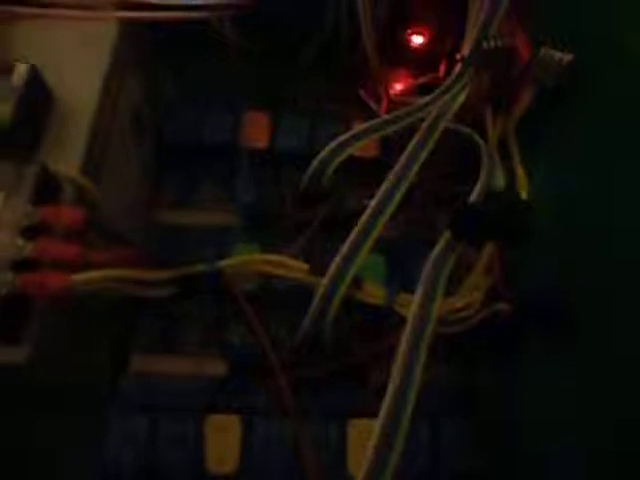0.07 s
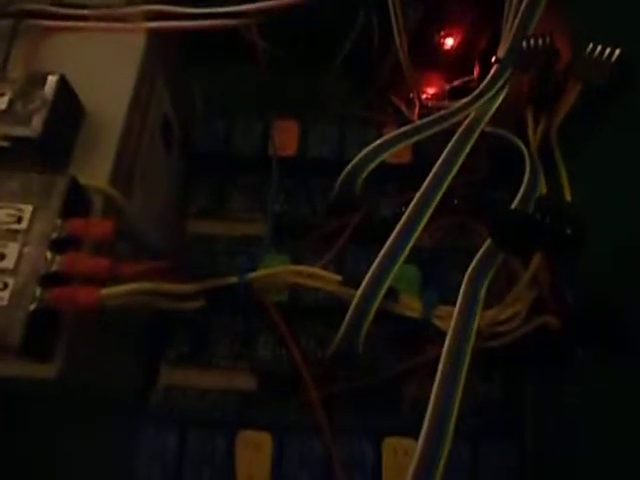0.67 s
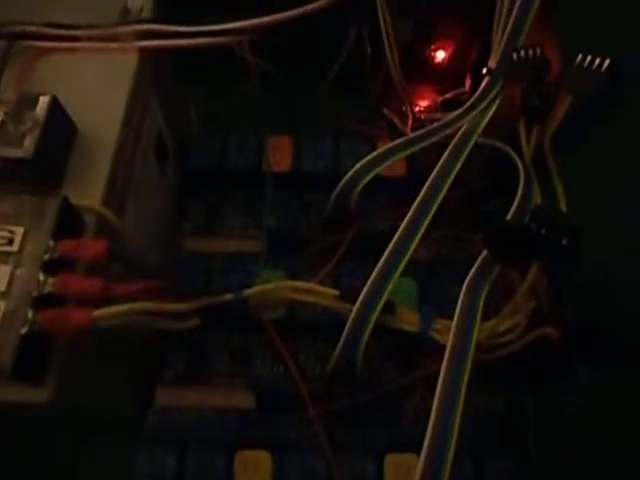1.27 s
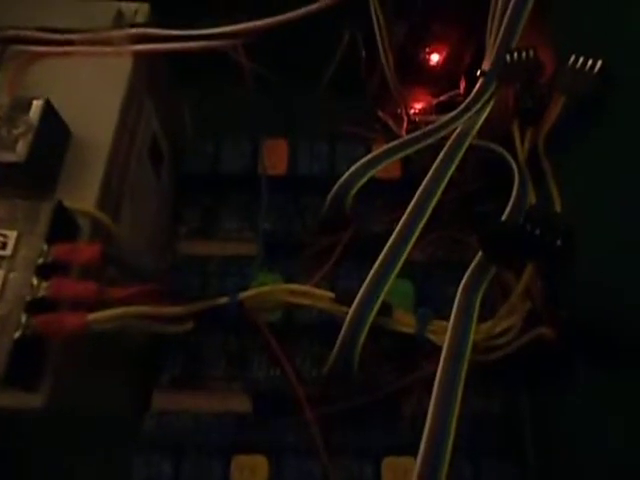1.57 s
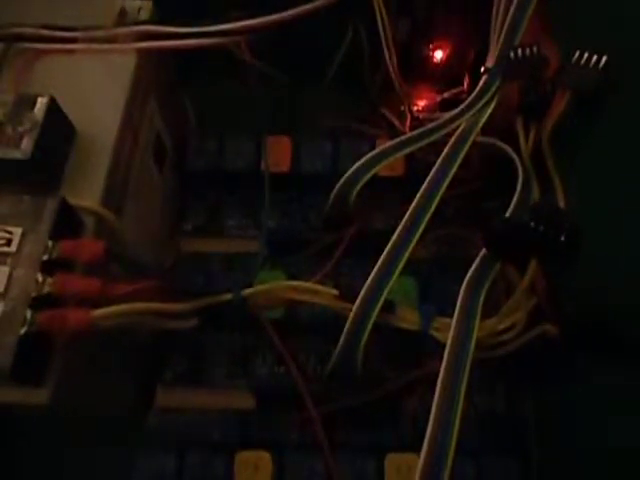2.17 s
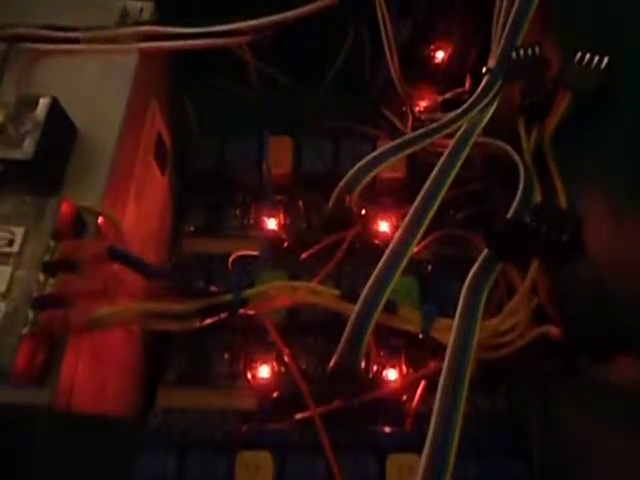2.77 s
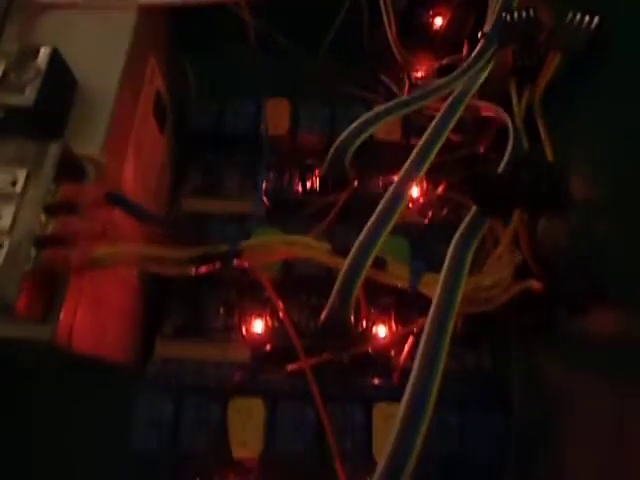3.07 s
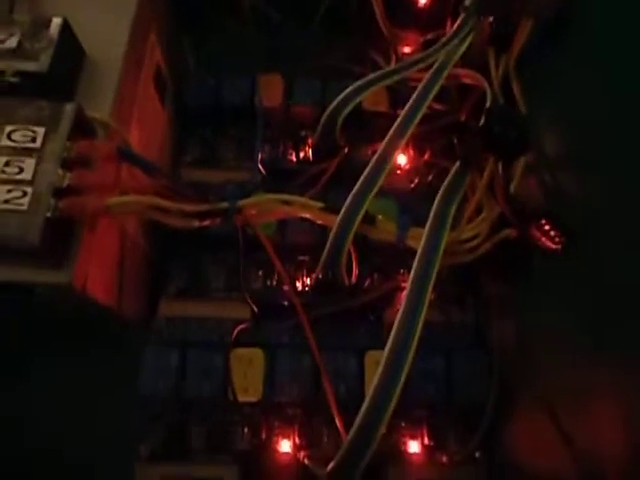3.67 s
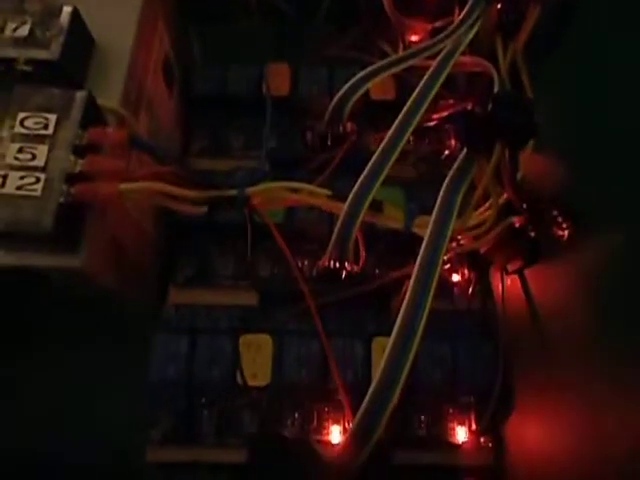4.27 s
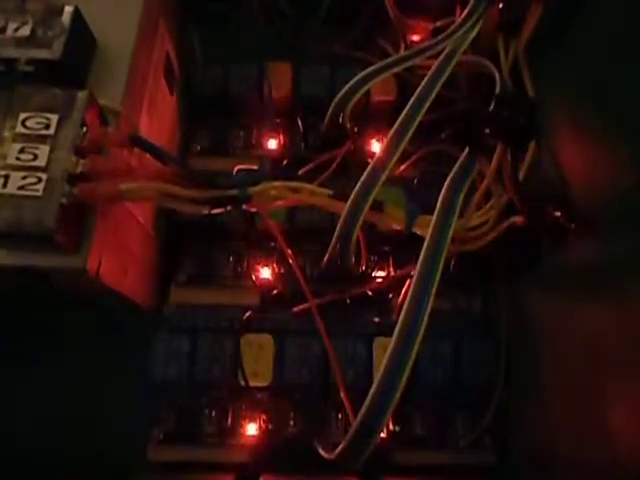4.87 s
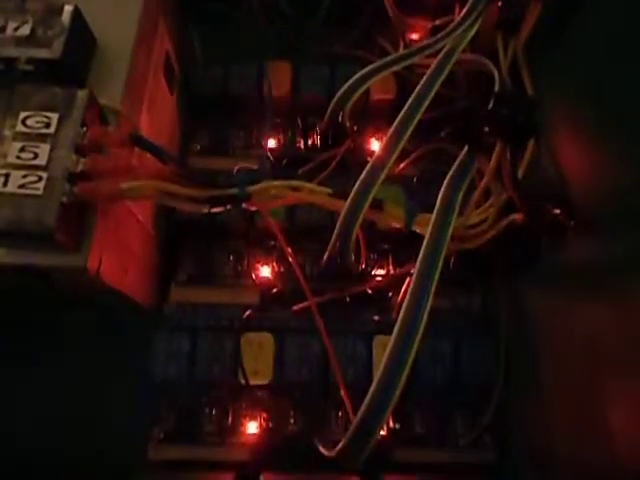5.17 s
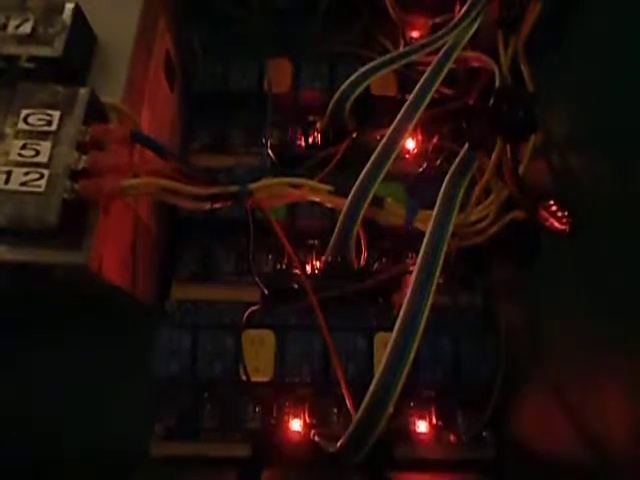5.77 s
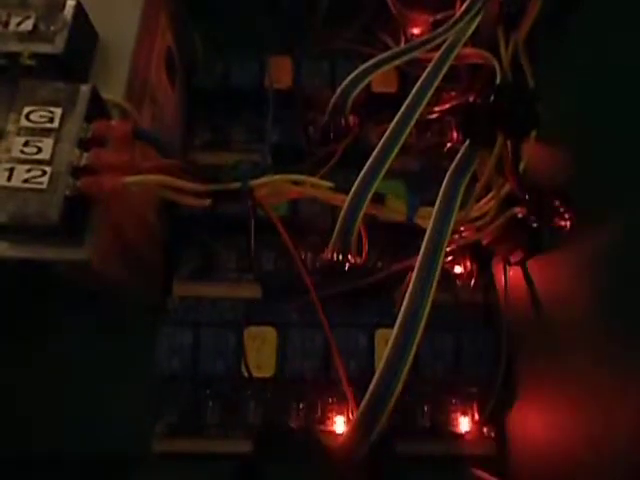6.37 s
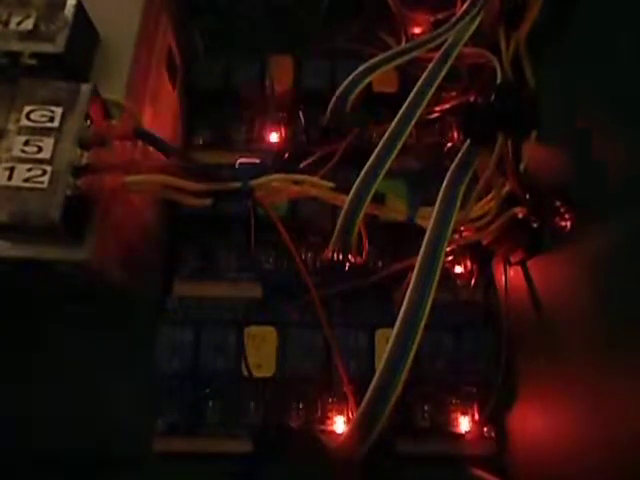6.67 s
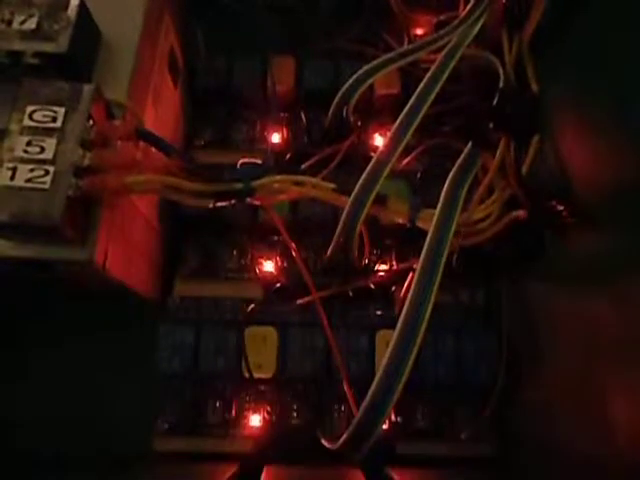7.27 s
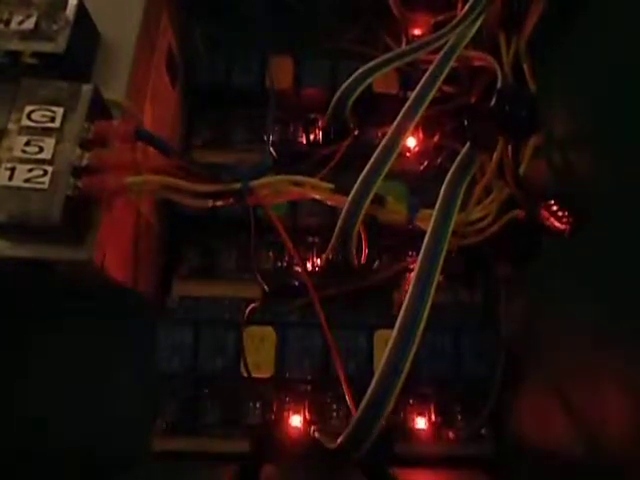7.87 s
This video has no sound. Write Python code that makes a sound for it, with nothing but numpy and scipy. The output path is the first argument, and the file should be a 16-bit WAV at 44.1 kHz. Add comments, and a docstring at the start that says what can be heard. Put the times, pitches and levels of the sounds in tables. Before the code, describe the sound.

A bank of small relays clicks in quick, evenly repeating bursts, close up, over faint hiss and hum in a quiet room.

```python
"""A bank of small relays clicks through an 18-step light sequence, close up, six steps to a burst.
An armature drops out and, milliseconds later, the next snaps shut and bounces; cases, circuit boards
and springs ring. A quiet room answers. Hiss and hum sink as the clicking starts; around it sit
a few faint ticks, one thin whistle and the low drone of an engine revving far away."""
import sys
import numpy as np
from scipy import signal
from scipy.fft import rfft, irfft
from scipy.io import wavfile

SR = 44100
rng = np.random.default_rng(int(sys.argv[2]) if len(sys.argv) > 2 else 0)


def transcribe(signal):
    """Save signal, clipped to [-1, 1], as a 16-bit WAV file at the path in sys.argv[1]."""
    frames = np.atleast_2d(signal).T
    limited = np.clip(frames, -1, 1)
    pcm = np.round(limited * 32767).astype(np.int16)
    wavfile.write(sys.argv[1], SR, pcm)


N = 348831
SIZE = 8192  # samples in one click
HZ = np.fft.rfftfreq(SIZE, 1 / SR)


def amp(db):
    """Decibels to gain."""
    return 10 ** (np.asarray(db) / 20)


def unit_rms(x):
    """Scales to rms 1."""
    return x / np.sqrt(np.mean(x ** 2) + 1e-20)


def read(points, hz):
    """Reads a table on a log-frequency axis."""
    f, value = np.transpose(points)
    return np.interp(np.log(hz + 1), np.log(f + 1), value)


def add(mix, s, sound):
    """Mixes a sound in at time s."""
    part = mix[round(s * SR):][:len(sound)]
    part += sound[:len(part)]


def ramp(start, length):
    """Linear fade from 0 to 1, timed in seconds."""
    return np.clip((np.arange(N) / SR - start) / length, 0, 1)


def drift(hz):
    """Smooth random modulation of rms 1, up to about the given rate."""
    smoothing = np.exp(-(np.fft.rfftfreq(N, 1 / SR) / hz) ** 2)
    return unit_rms(irfft(rfft(rng.standard_normal(N)) * smoothing, N))


def tone(hz):
    """A sine of rms 1 that follows a pitch curve."""
    return np.sqrt(2) * np.sin(2 * np.pi * np.cumsum(hz) / SR)


def causal(gain):
    """Minimum-phase response: it has this gain and rings only after the blow."""
    log_gain = np.log(np.r_[gain, gain[-2:0:-1]] + 1e-5)
    return np.exp(np.conj(signal.hilbert(log_gain)))[:len(gain)]


def body(modes):
    """Gain of a set of resonances."""
    f = HZ + 1
    power = sum(amp(db) ** 2 / (1 + ((f * f - hz * hz) / (f * width)) ** 2) for hz, width, db in modes)
    return np.sqrt(1e-4 + power)


# Hum and thin whine: (pitch [Hz], level against the hiss [dB], pitch waver [Hz])
HUM_TONES = [(60, -15, 2), (266.6, -15.5, 2.2), (332.5, -15.5, 2.48), (493, -8.5, 1.02), (592, -19.5, 7),
             (7300, -34, 38), (7830, -34, 12), (8225, -38.5, 12)]
def hum(waver_db=1.5):
    """Held tones, each wavering in level and pitch."""
    return sum(amp(db + waver_db * drift(3.9)) * tone(hz + waver * drift(10))
               for hz, db, waver in HUM_TONES)


# Colour of the noise bed: (frequency [Hz], relative density [dB])
HISS_COLOUR = [(8, -9.5), (20, -2.5), (59, -1), (85, -8.5), (133, -7), (200, -6), (264, -12), (333, -10.5),
               (398, -14), (488, -8), (600, -10), (760, -16.5), (1390, -19.5), (3000, -25), (5000, -29.5),
               (7300, -31.5), (8100, -41.5), (9000, -62.5), (11700, -91.5)]
def background(bed_db=-48, hiss_db=-1, hiss_sink_db=-10.5, hum_sink_db=-9.5,
               rumble_hz=52, rumble_db=-54):
    """Hiss and hum duck at the first relay click and stay down; the deepest rumble holds."""
    f = np.fft.rfftfreq(N, 1 / SR)
    noise = unit_rms(irfft(rfft(rng.standard_normal(N)) * amp(read(HISS_COLOUR, f)), N))
    rumble = irfft(rfft(noise) / (1 + (f / rumble_hz) ** 10), N)
    sunk = ramp(BURSTS[0][0], length=.055)
    hiss = amp(hiss_db + hiss_sink_db * sunk) * (noise - rumble)
    bed = hiss + amp(hum_sink_db * sunk) * hum()
    return ramp(start=.068, length=.0026) * (amp(bed_db) * bed + amp(rumble_db) * rumble)


def chatter(grain, rise, fall, linger_db, linger, even_hz=330, impact=0):
    """Spectrum of a blow: optional hard impact, dense bounces, then scatter from nearby parts."""
    t = np.arange(SIZE) / SR
    decay = np.exp(-t / fall) + amp(linger_db) * np.exp(-t / linger)
    bounces = grain * (1 - np.exp(-t / rise)) * decay
    blow = rfft(bounces / np.linalg.norm(bounces)) + impact * np.exp(-2j * np.pi * HZ * rise)
    # flatten the broad colour, so the struck body sets the tone
    window = np.exp(-.5 * (np.r_[-HZ[200:0:-1], HZ[:201]] / even_hz) ** 2)
    power = np.convolve(abs(blow) ** 2, window / window.sum(), "same")
    return blow / causal(np.sqrt(power))


# Cues of the faint ticks: (time [s], relative level [dB])
TICK_CUES = [(0.1827, -23), (0.217, -32), (0.8295, -40), (0.8845, -36), (0.986, -35), (1.39, -37),
             (1.4188, -42), (1.6498, -33), (2.0563, -34), (2.8827, -43), (4.4163, -49.5), (5.1493, -44.5),
             (5.688, -43.5)]
# The ring of a tick: (frequency [Hz], width [Hz], level [dB])
TICK_MODES = [(1245, 160, 5.5), (2730, 200, 2.5), (3070, 260, 5.5), (4130, 690, -3.5), (5300, 500, -2.5),
              (6230, 740, -2)]
def ticks(level_db=20, dull_hz=6300):
    """Small dry blows on one set of resonances, duller than the relays."""
    out = np.zeros(N)
    ring = causal(body(TICK_MODES) / np.sqrt(1 + (HZ / dull_hz) ** 10))
    for s, db in TICK_CUES:
        blow = chatter(rng.standard_normal(SIZE), rise=.00076, fall=.0025, linger_db=-13, linger=.0067)
        add(out, s, amp(db + level_db) * irfft(ring * blow))
    return out


# Decay of the room: (frequency [Hz], time to fall 60 dB [s])
ROOM_T60 = [(200, 0.8), (1000, 0.21), (2400, 0.29), (3000, 0.11), (3700, 0.27), (7000, 0.22), (9000, 0.26)]
# Colour of its tail: (frequency [Hz], relative level [dB])
ROOM_COLOUR = [(130, 6), (400, -7.5), (1000, -2.5), (2300, -2.5), (3000, 3.5), (3700, -6.5), (5500, -2.5),
               (7200, -0.5), (8500, -2.5)]
def room(x, wet_db=-16.5, predelay_s=.019, taps_per_s=6000, wall_s=.019, wall_db=-25, wall_fall_s=.008):
    """Sparse reflections that die band by band, with a cluster from a nearby wall."""
    t = np.arange(SR // 2) / SR
    taps = rng.standard_normal(len(t)) * (rng.random(len(t)) < taps_per_s / SR)
    hz, age, bands = signal.stft(unit_rms(taps) * (t > predelay_s), SR, nperseg=256)
    band_db = read(ROOM_COLOUR, hz)[:, None] - 60 * age / read(ROOM_T60, hz)[:, None]
    tail = signal.istft(bands * amp(band_db), SR, nperseg=256)[1][:len(t)]
    cluster = rng.standard_normal(len(t)) * (t > wall_s) * np.exp(-abs(t - wall_s) / wall_fall_s)
    echo = amp(wet_db) * tail / np.linalg.norm(tail) + amp(wall_db) * cluster / np.linalg.norm(cluster)
    return signal.fftconvolve(x, echo)[:N]


def whistle(start_s=.24, length_s=.225, fade_s=.02, hz=7250, waver_hz=35, level_db=-73, flicker_db=2):
    """A faint, unsteady high tone that fades in and out once."""
    held = ramp(start_s, fade_s) - ramp(start_s + length_s - fade_s, fade_s)
    return held * amp(level_db + flicker_db * drift(15)) * tone(hz + waver_hz * drift(60))


# Bursts of clicks: (start [s], level trim [dB], lag of the last step [s])
BURSTS = [(2.3143, 2, 0.0055), (3.0416, -0.9, 0), (3.7664, -3.5, 0.0029), (4.5083, -2.5, 0.00064),
          (5.2356, 0, 0.00013), (5.961, 0, 0.0012), (6.7029, 0, 0), (7.4299, 0.3, 0)]
# The light sequence, a row to a step:
# (snap time in the burst [s], snap [dB], drop-out lead [s], drop-out [dB], board knock [dB])
SEQUENCE = [(0, .9, .0007, -18, 1.5), (.0696, -0.1, .002, -8, 2.1), (.1339, -1.3, .0029, -3.5, 3),
            (.1974, -3, 0.00035, -0.5, 2.5), (.2659, -0.5, .0024, -4, 2.5), (.3354, -2, .0071, -1, 4),
            (0, -1.5, .0036, -10, 2.5), (.0639, -1, 0.0026, -5.5, 0.8), (.131, -0.7, .0026, -1.5, 2),
            (.2003, -4, .007, -1, 0), (.2613, .2, .0017, -7.5, 0.4), (.328, -1.5, .0021, -9, 1.9),
            (0, -0.5, .0036, -1.5, 1.5), (.0638, 1.5, .0024, -11, 4.5), (.133, 2, .0062, -1.9, 0),
            (.1957, -3, .0043, -.5, 3.5), (.2634, 1.3, .0055, -3.5, 2.5), (.3244, -0.6, .002, -3, 3)]
def steps(per_burst=6, opening_knock_db=-8.5):
    """Loops the sequence; yields (place, time, snap gain, lead, drop-out gain, knock gain)."""
    for burst, (start, db, lag) in enumerate(BURSTS):
        for step in range(per_burst):
            place = (burst * per_burst + step) % len(SEQUENCE)
            offset, snap_db, lead, drop_db, knock_db = SEQUENCE[place]
            s = start + offset + lag * (step / (per_burst - 1)) ** 2
            if burst == 0:  # no relay is on yet: none drops out, and the board is knocked less
                yield place, s, amp(db + snap_db), 0, 0, amp(db + knock_db + opening_knock_db)
            else:
                yield place, s, amp(db + snap_db), lead, amp(db + drop_db), amp(db + knock_db)


def broadened(modes, widen=.0033):
    """Higher resonances are broadened at equal energy, so each click sounds dry rather than pinging."""
    return [(hz, width + widen * hz, db - 10 * np.log10(1 + widen * hz / width))
            for hz, width, db in modes]


# Board modes, then case modes, a list to each place in the sequence, before broadening:
# (frequency [Hz], width [Hz], level [dB])
RELAY_MODES = [
    [(131, 32, -0.5), (383.5, 18, 7.5), (402, 27.6, 17), (930, 44, 1.5), (1900, 600, -8), (3280, 420, 3),
     (4100, 250, 3), (5240, 70, 3.5), (6400, 310, 7), (7520, 140, 13.5), (7470, 130, 14.5), (8570, 180, 10)],
    [(125, 18, 6.5), (394, 24, 12.5), (430, 20, 9.5), (676, 36, 4), (770, 27, 0), (1180, 87, 1),
     (2093, 160, -5.5), (3630, 210, 4), (5100, 1000, 0), (6900, 150, 4), (7290, 183, 5.5), (8590, 178, -6)],
    [(133.4, 42, 6), (385, 41, 8.5), (655, 23, -0.5), (937, 54, -3.5), (1150, 35, 0), (2970, 560, -2.5),
     (3260, 123, 2.5), (4230, 91, -3), (4540, 84, 1.5), (5370, 660, 0), (6200, 214, -1.5), (7240, 750, 6)],
    [(119, 64, -5.5), (358, 48, 1.5), (611, 39, 7), (950, 73, -6.5), (1200, 30, -6.5), (1870, 300, -6.5),
     (2900, 342, -19.5), (3640, 130, -2.5), (4490, 347, -2.5), (5100, 130, 5.5), (6920, 320, 5.5),
     (7240, 240, 8.5)],
    [(118, 41, -1.5), (378.3, 35, 9), (630, 30, 0.5), (940, 16, 5.5), (1150, 110, -2.5), (2950, 680, -2.5),
     (4700, 296, -2), (5400, 163, 0), (6220, 740, 6.5), (7110, 210, 14), (7200, 117, 6.5), (8400, 280, 3.5)],
    [(115.2, 71, -4), (359.4, 41, 6.5), (480, 30, -5), (637, 20, 1), (935, 92, -9), (1650, 190, -11.5),
     (2273, 490, -8), (2870, 420, -6), (4400, 170, 0), (5140, 240, 2.5), (6340, 398, 2), (7110, 680, 6)],
    [(139, 51, -1.5), (407, 72, -3), (704, 24, 0), (956, 27, -2), (2120, 280, -9.5), (2880, 370, -5.5),
     (4100, 170, -1.5), (5330, 78, 2), (5460, 72, 3.5), (6200, 150, 12.5), (6640, 180, 16),
     (7030, 460, 13.5)],
    [(128.3, 23, 8), (368, 25, 7.5), (435, 21, 10.5), (642, 25, 7), (935, 130, -7.5), (1184, 52, -4),
     (1910, 270, -10), (2813, 680, -9), (3840, 280, -5.5), (5450, 150, 4), (5710, 360, 5.5),
     (6800, 540, 6.5)],
    [(137, 21, 8.5), (400, 60, 8.5), (636, 220, -2.5), (1863, 260, -3), (2780, 414, -3), (3266, 95, 3),
     (4130, 220, -3.5), (5540, 640, -8), (6130, 87, 6.5), (6655, 110, 2.5), (7180, 135, 15.5),
     (8550, 290, 3.5)],
    [(134, 27, 3.5), (383.5, 30, 10), (545, 42, 4), (940, 46, -1), (1186, 96, -4.5), (1870, 410, -3.5),
     (2260, 110, -4.5), (3687, 270, -0.5), (5054, 430, -8), (5980, 77, 1), (6220, 73, 1), (6960, 630, 9)],
    [(119, 33, -3.5), (385.5, 29, 12), (850, 27, 1), (947, 33, 1), (1120, 31, 3.5), (2357, 280, -7),
     (3770, 117, -4.5), (4300, 400, 0), (5100, 150, 3), (6800, 230, 2), (7500, 230, 5.5), (8600, 166, 5)],
    [(122, 39, -1.5), (361.3, 57, 3.5), (612, 30, -1), (1070, 94, 2), (1840, 500, -6), (2320, 70, 1.5),
     (2900, 200, -3.5), (5000, 630, 4), (6130, 360, 7), (6540, 130, 1), (7130, 210, 15), (7500, 1048, 6)],
    [(141, 32, 7), (414, 22, 16.5), (423, 19, 11.5), (580, 30, 1.5), (738, 29, 4.5), (965, 34, 8.5),
     (1828, 390, -8.5), (2960, 410, -0.5), (3980, 512, -2.5), (5330, 200, -4), (6385, 430, 4.5),
     (7430, 616, 7)],
    [(116.3, 11, 7), (422, 28, 6.5), (637, 38, 3.5), (886, 31, 3.5), (1160, 190, -4.5), (1930, 120, -1),
     (3740, 220, 6.5), (4230, 150, 8), (5209, 850, 6.5), (6740, 170, 18.5), (6940, 153, 19),
     (7050, 130, 18)],
    [(121, 40.5, 4.5), (357, 31, 10), (450, 30, 8), (607, 19, 10.5), (950, 59, -2.5), (1254, 39, 4.5),
     (2840, 180, 0), (4503, 140, -4.5), (5300, 200, 3.5), (5930, 210, 0), (6761, 270, 8.5),
     (7148, 133, 4.5)],
    [(122, 61, -4.5), (339.6, 48, 6.5), (518, 37, -4.5), (587, 32, 5), (928, 34, 1.5), (1850, 250, -5.5),
     (2882, 92, -12), (3628, 230, -5), (4090, 116, -5.5), (5130, 120, 2.5), (6115, 440, 1.5),
     (7350, 480, 0)],
    [(119, 32, 1), (362, 30, 3), (645, 17, 7), (920, 51, 5), (1930, 88, 1.5), (2314, 150, 0), (3005, 41, 4),
     (4570, 620, 0.5), (5761, 115, 1.5), (6360, 99, 6.5), (6747, 467, -1.5), (7600, 900, 2.5)],
    [(110, 84, -3.5), (350, 29, 10), (626, 30, 0.5), (940, 41, 1.5), (1140, 46, -3), (1820, 490, -12.5),
     (2860, 442, -5.5), (4900, 420, 5.5), (5800, 160, 1.5), (6705, 177, 4.5), (7240, 93, 11),
     (8100, 960, -3)],
]
# The softer blow of a drop-out, against a snap: (frequency [Hz], level [dB])
DROP_COLOUR = [(150, -21.5), (600, -8.5), (1500, 1.5), (3000, 1.5), (5000, 3.5), (7000, -3), (8500, 2)]
def relays(variation=.29, crossover_hz=1800, bend_s=.003207, own_share=.68):
    """Each armature bounces its own way, nearly alike each time. Returns direct sound and room send."""
    habits = rng.standard_normal((len(RELAY_MODES), 3, SIZE))
    gains = [body(broadened(modes)) for modes in RELAY_MODES]
    bank = np.sqrt(np.mean(np.square(gains), 0))  # towards the room the whole bank radiates
    voices = [(causal(own), causal(own ** own_share * bank ** (1 - own_share))) for own in gains]
    lows = 1 / (1 + (HZ / crossover_hz) ** 4)
    # bending waves in the board: the lower, the later; bend_s is the delay at 400 Hz
    board = causal(np.sqrt(lows)) * np.exp(-4j * np.pi * bend_s * np.sqrt(400 * HZ))
    case = causal(np.sqrt(1 - lows))
    soft = causal(amp(read(DROP_COLOUR, HZ)))
    out = np.zeros((2, N))
    for place, s, snap_gain, lead, drop_gain, knock_gain in steps():
        grain = habits[place] + variation * rng.standard_normal((3, SIZE))
        snap = chatter(grain[0], rise=.0003926, fall=.001, linger_db=-14, linger=.0062, impact=.74)
        drop = chatter(grain[1], rise=.00052, fall=.0053, linger_db=-22, linger=.0099)
        knock = chatter(grain[2], rise=.00079, fall=.0061, linger_db=-30.5, linger=.016, even_hz=45.6)
        for path, voice in zip(out, voices[place]):
            add(path, s, snap_gain * irfft(voice * case * snap))
            add(path, s - lead, drop_gain * irfft(voice * soft * drop))
            add(path, s - lead * .8, knock_gain * irfft(voice * board * knock))
    return out


# Armature springs, alike in every relay: (frequency [Hz], width [Hz], relative level [dB])
SPRING_MODES = [(2890, 15, -6), (3010, 14, -6), (3130, 14, -8.5)]
def springs():
    """Every snap leaves the springs ringing faintly."""
    out, t = np.zeros(N), np.arange(SIZE) / SR
    for _, s, snap_gain, *_ in steps():
        for (hz, width, db), turn in zip(SPRING_MODES, rng.random(len(SPRING_MODES))):
            height = 2 * np.pi * width / SR * snap_gain * amp(db)
            add(out, s, height * np.exp(-np.pi * width * t) * np.sin(2 * np.pi * (hz * t + turn)))
    return out


# The far engine, one blip and then a long pull: (time [s], firing rate [Hz])
REVS = [(3.5, 30), (3.88, 40), (4.25, 70.4), (4.5, 76.4), (4.699, 66), (5.07, 36.4), (5.35, 36.3),
        (6.9, 62), (7.9, 80)]
# The room booms as an engine order passes a low resonance: (frequency [Hz], level [dB])
ROOM_BOOM = [(30, -88), (36, -68), (41, -56), (48, -53), (59, -46), (67, -55), (72, -65), (80, -67),
             (104, -61.5), (124, -57.5), (140, -66.5), (160, -74)]
def engine(unsteady=.012, second_db=1, throttle_db=3.5, blip_hz_per_s=70, coast_db=-10, uneven_db=1.5):
    """Only the two lowest orders come through the walls: louder on the throttle, smoother coasting."""
    times, rates = np.transpose(REVS)
    hz = np.interp(np.arange(N) / SR, times, rates)
    firing_hz = hz * (1 + unsteady * drift(8.5))
    push = np.gradient(hz) * SR / blip_hz_per_s
    throttle, coast = np.clip(push, 0, 1), np.clip(-push, 0, 1)
    first_gain = amp(read(ROOM_BOOM, hz) + throttle_db * throttle + uneven_db * drift(7.2))
    second_gain = amp(read(ROOM_BOOM, 2 * hz) + second_db + coast_db * coast + uneven_db * drift(6.6))
    fade_in = ramp(times[0], times[1] - times[0]) ** 4
    return fade_in * (first_gain * tone(firing_hz) + second_gain * tone(2 * firing_hz))


def scene(top_hz=7900, engine_db=-2):
    """Clicks, their top treble rolled off, in the room over the bed, whistle and engine."""
    clicks = relays() + springs() + ticks()
    direct, send = signal.sosfilt(signal.butter(14, top_hz, fs=SR, output="sos"), clicks)
    return (direct + room(send) + background() + whistle() + amp(engine_db) * engine())[None]


def record(dry, edge_hz=9200):
    """A steep low-pass on the whole mix."""
    lowpass = signal.firwin(255, edge_hz, window=("kaiser", 9), fs=SR)
    return signal.oaconvolve(dry, lowpass[None], "same")


dry = scene()
out = record(dry)
transcribe(out)
```